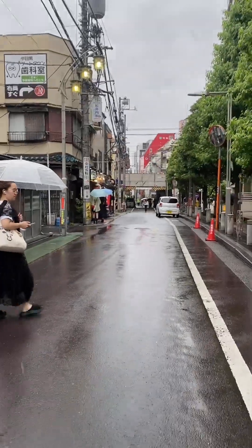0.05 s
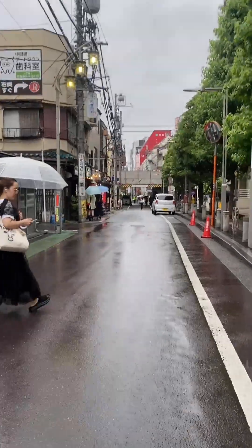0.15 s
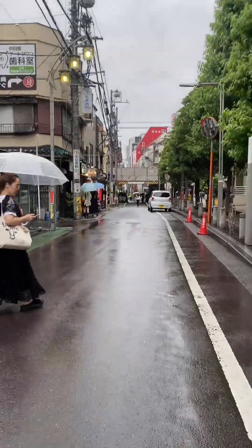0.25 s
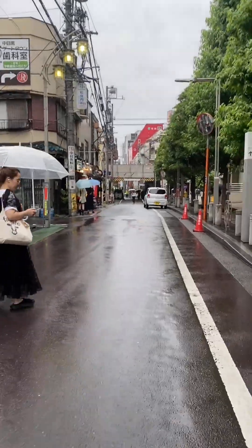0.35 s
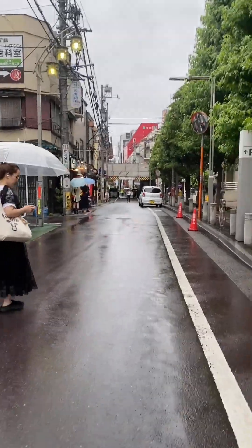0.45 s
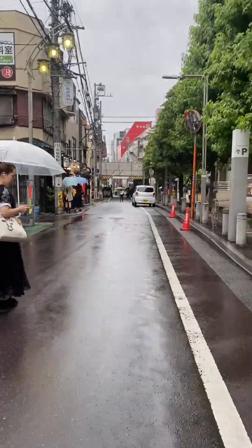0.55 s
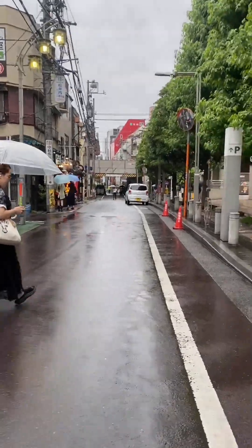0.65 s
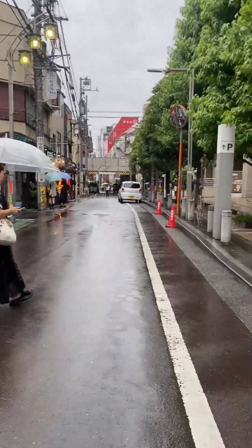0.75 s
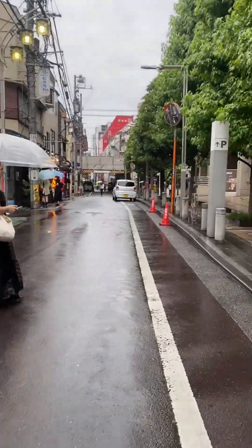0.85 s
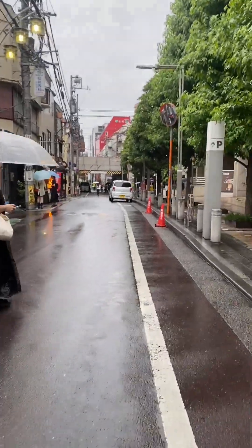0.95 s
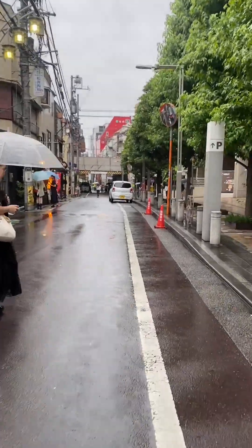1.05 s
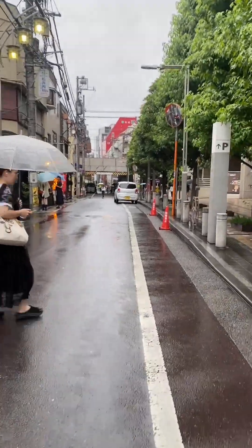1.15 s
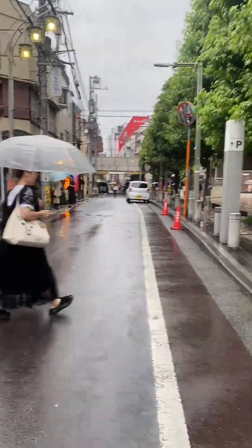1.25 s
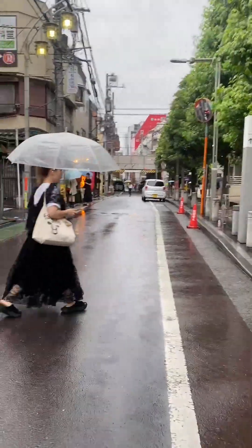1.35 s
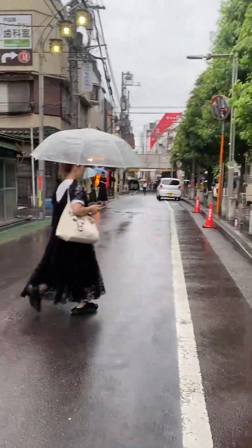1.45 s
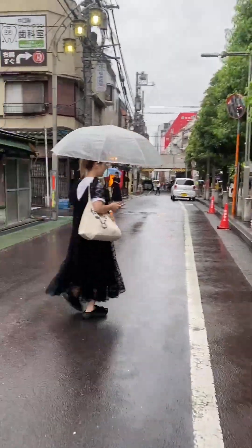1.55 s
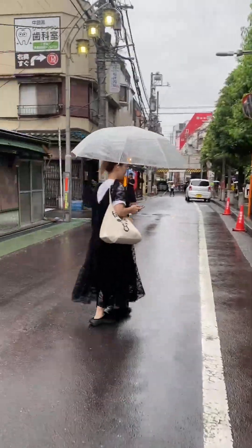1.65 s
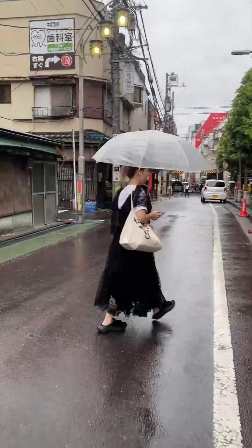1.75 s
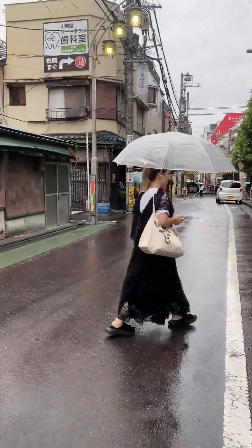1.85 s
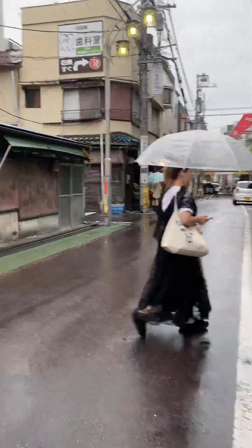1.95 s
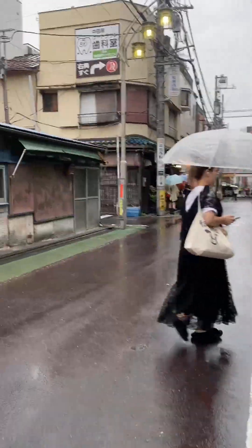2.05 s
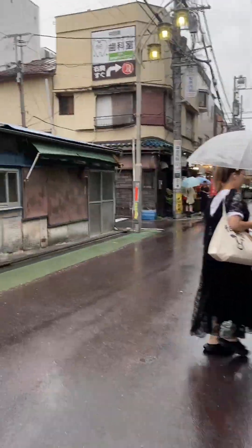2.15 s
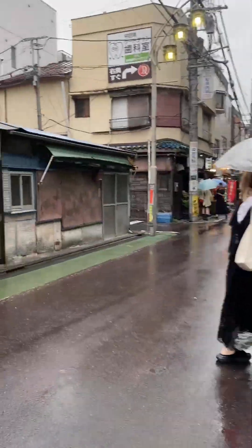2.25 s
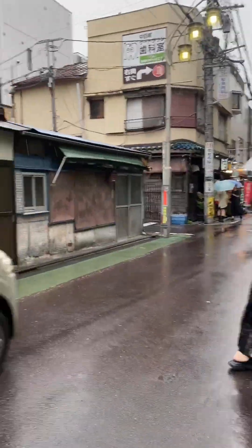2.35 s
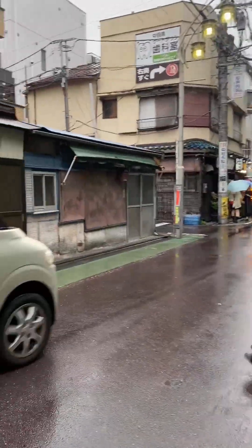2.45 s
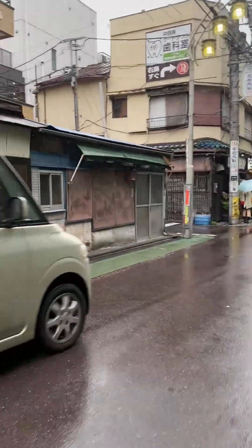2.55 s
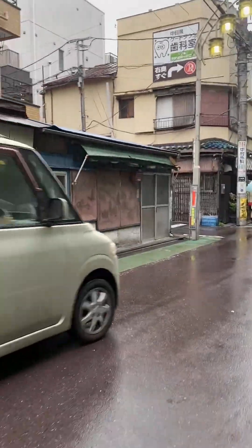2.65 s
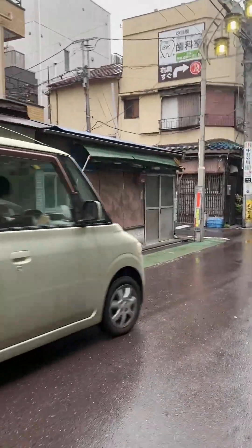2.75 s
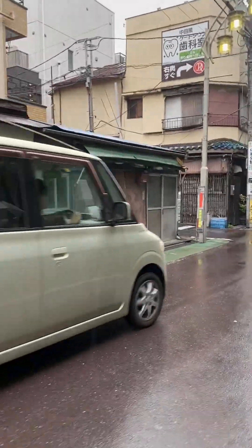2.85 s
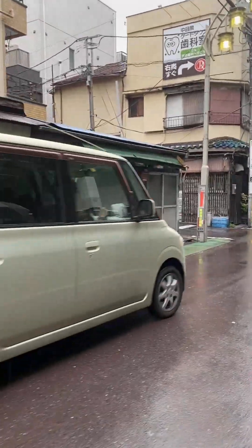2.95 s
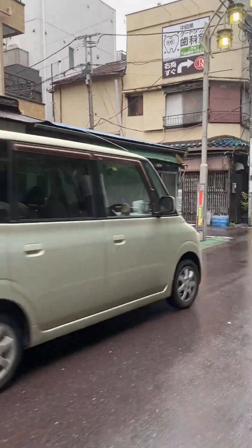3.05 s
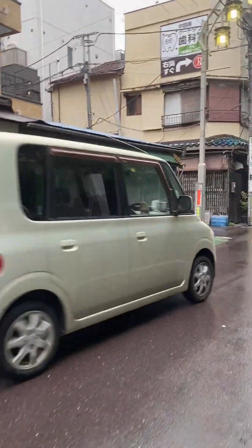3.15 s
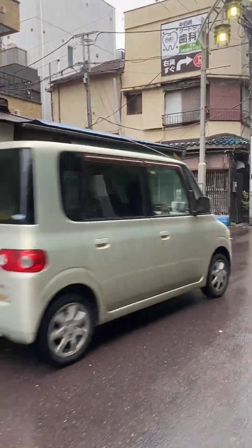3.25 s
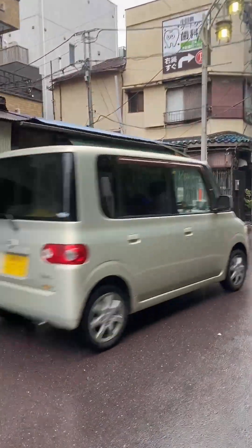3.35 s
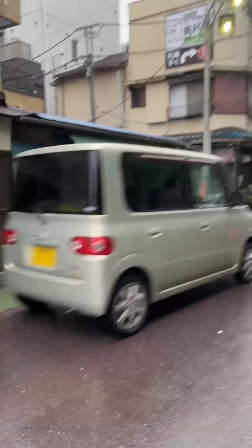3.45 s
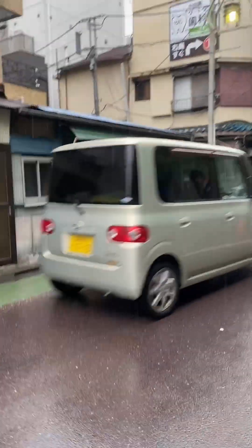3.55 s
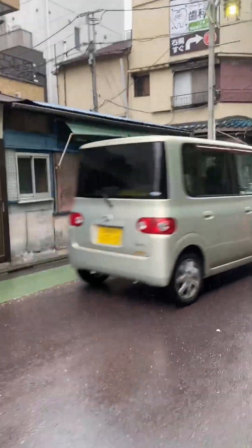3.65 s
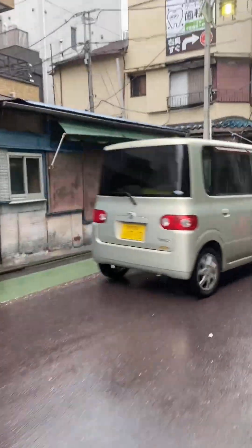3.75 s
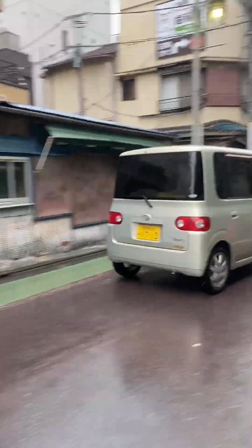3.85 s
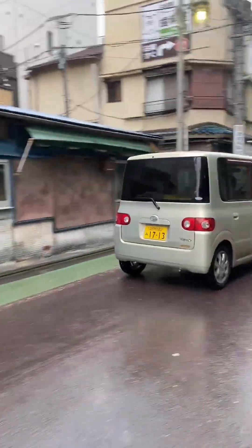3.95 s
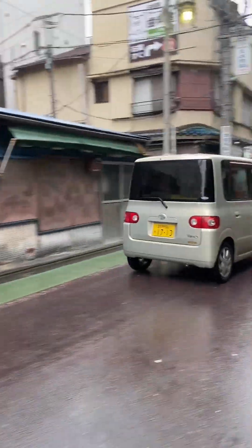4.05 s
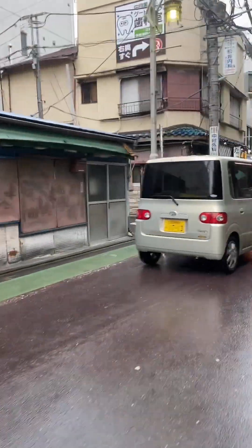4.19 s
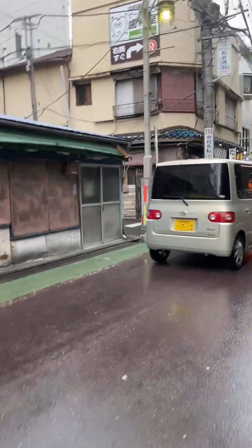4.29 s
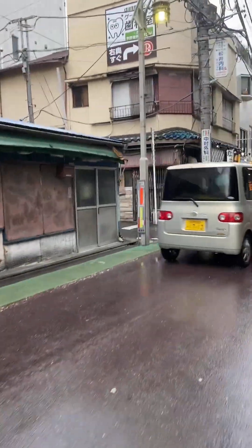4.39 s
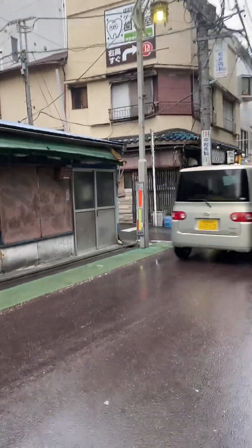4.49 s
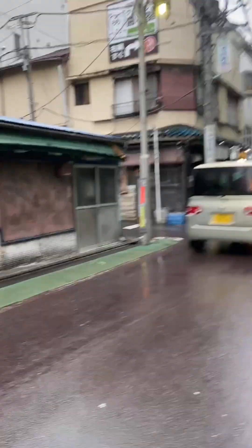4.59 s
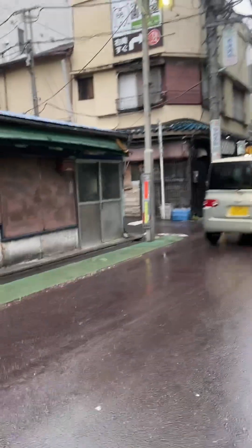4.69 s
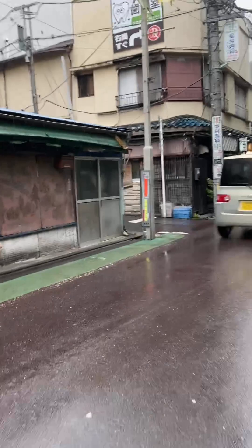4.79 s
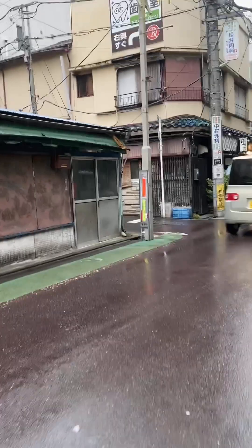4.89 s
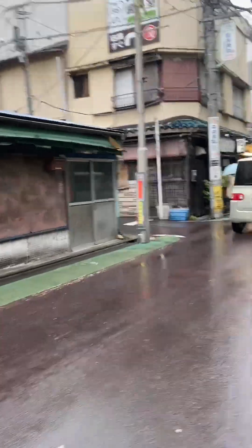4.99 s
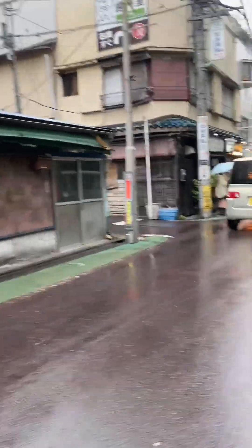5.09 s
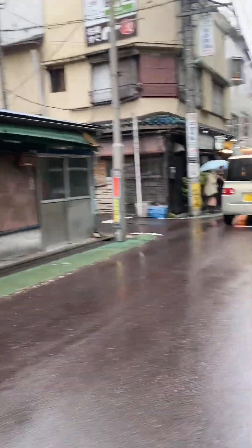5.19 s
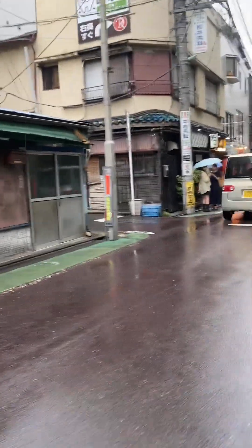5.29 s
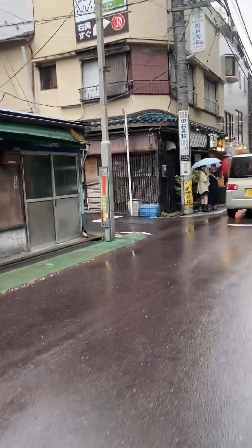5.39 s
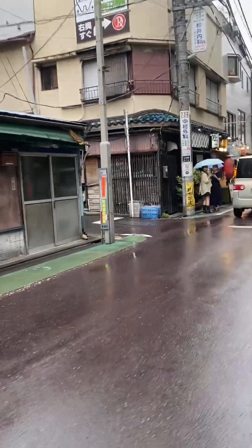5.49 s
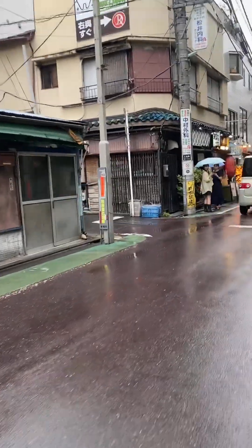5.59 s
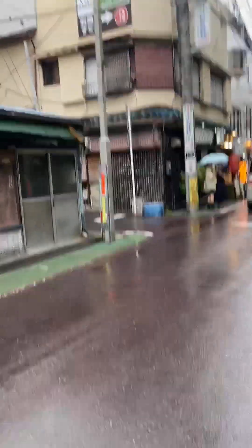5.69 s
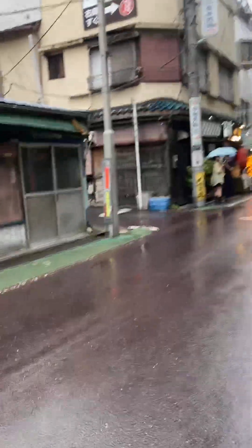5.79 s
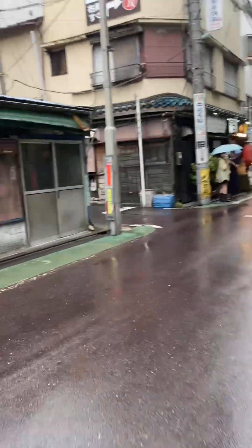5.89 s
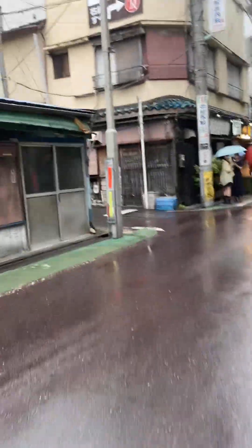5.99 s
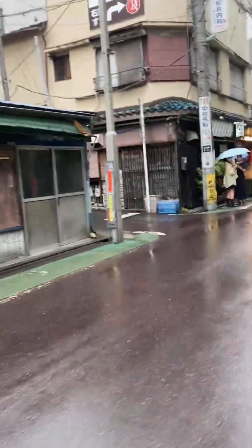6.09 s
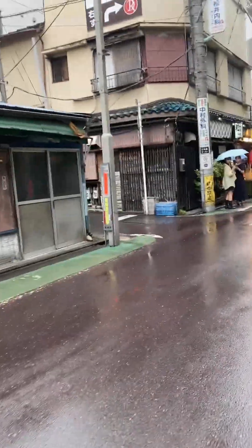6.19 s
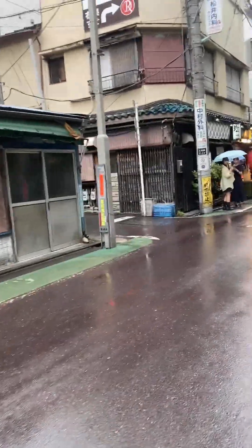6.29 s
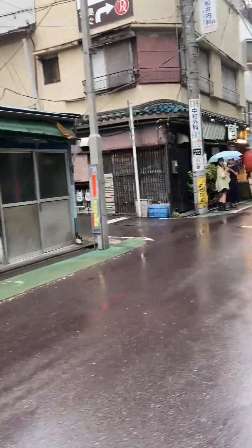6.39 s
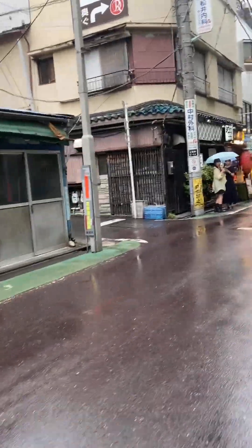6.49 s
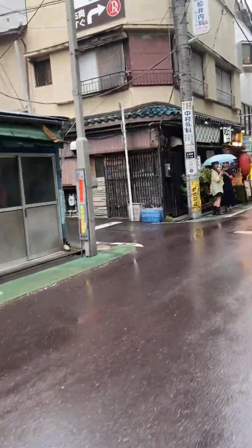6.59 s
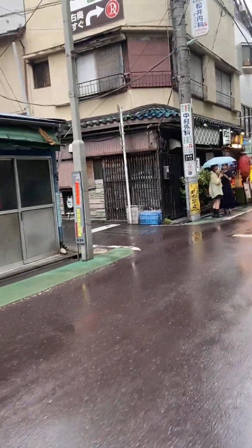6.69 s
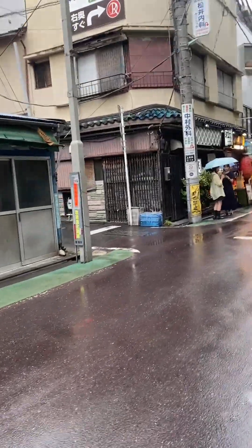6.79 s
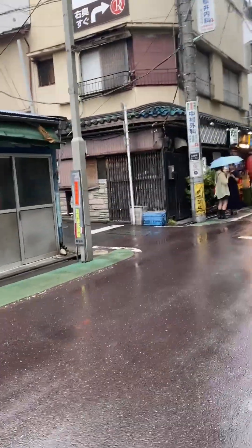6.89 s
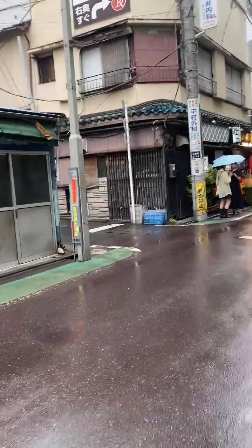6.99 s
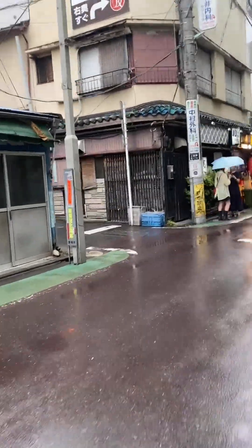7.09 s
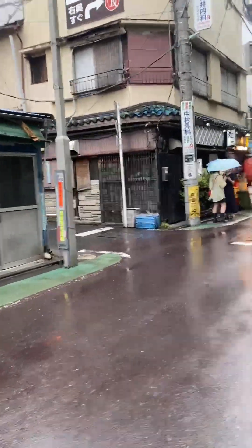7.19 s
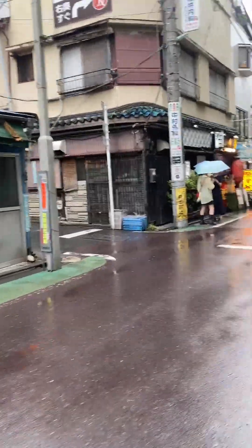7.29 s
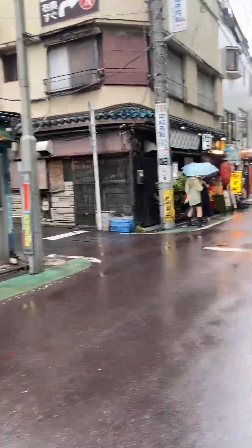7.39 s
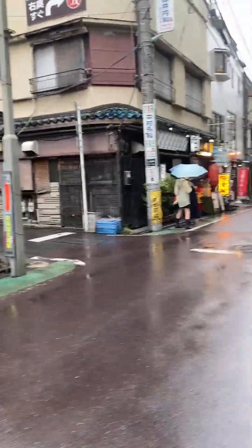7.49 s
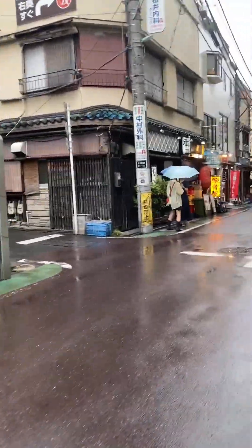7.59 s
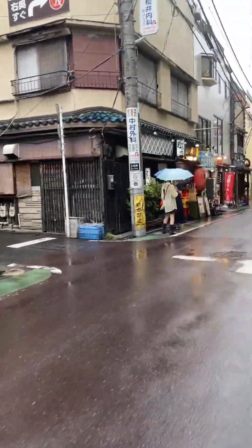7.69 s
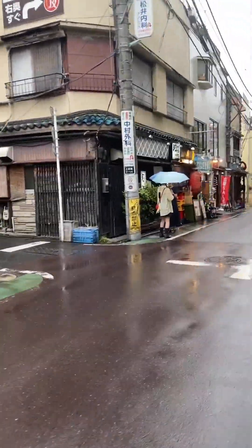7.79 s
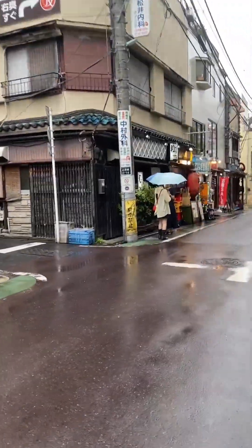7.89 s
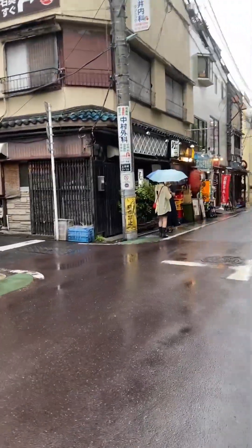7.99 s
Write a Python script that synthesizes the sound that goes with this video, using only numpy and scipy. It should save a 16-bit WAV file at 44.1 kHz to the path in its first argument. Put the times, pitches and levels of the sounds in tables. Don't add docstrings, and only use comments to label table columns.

```python
import sys
import numpy as np
from scipy import signal
from scipy.fft import rfft, irfft, next_fast_len
from scipy.io import wavfile
from scipy.ndimage import uniform_filter1d

SR = 44100
rng = np.random.default_rng(int(sys.argv[2]) if len(sys.argv) > 2 else 0)


def level_to_linear(level):
    exponent = np.asarray(level, float) / 20
    return 10 ** exponent


def dump_mix(stems):
    frames = np.atleast_2d(stems).T
    limited = np.clip(frames, -1, 1)
    pcm = np.round(limited * 32767).astype(np.int16)
    wavfile.write(sys.argv[1], SR, pcm)


N = 354563
T = np.arange(N) / SR
SIZE = next_fast_len(N + SR // 10)
HZ = np.maximum(np.arange(SIZE // 2 + 1) * SR / SIZE, 1)

# (time [s], firing rate [Hz], strength at the listener [dB],
# boom of the tailpipe turned this way [dB])
ENGINE_COURSE = [(0, 25.96, -31, 0), (.9, 26.97, -30, 0), (1.24, 27.8, -29.5, -1.5), (1.36, 31, -22, -7),
                 (1.52, 34.76, -22.5, -2.5), (1.7, 39.73, -22.5, 2), (1.9, 45.84, -19.5, 1),
                 (2.11, 49.02, -18, 0), (2.4, 51.58, -16, -1.5), (2.7, 54.3, -18, -.5),
                 (3.05, 55.24, -17.5, -2), (3.65, 55.6, -15.5, -7), (3.95, 55.94, -16.5, -8),
                 (4.25, 56.54, -13, -15), (4.42, 55.4, -16, -13.5), (4.52, 52.9, -29, 1),
                 (4.63, 49.4, -29, -3.5), (4.85, 43.39, -40.5, -17)]
# (time [s], tyre hiss at the listener [dB], spray over hiss [dB])
ROAD_COURSE = [(0, -61.5, -12), (.9, -61, -11.5), (1.2, -59, -9.5), (1.45, -60.5, -5.5), (1.75, -54, -10.5),
               (2.2, -50, -10), (2.6, -46, -9), (3.2, -45, -11), (3.55, -45.5, -8), (3.85, -47, -8),
               (4.3, -47.5, -8), (4.85, -51.5, -8), (5.3, -53, -11.5), (5.75, -56.5, -12),
               (6.25, -59.5, -13.5), (6.6, -57.5, -14.5), (8.04, -60.5, -14.5)]
# (frequency [Hz], in step [-1..1], quarter cycle ahead [-1..1])
CAR_SIDE_LINK = [(99, -.25, -.65), (300, -0.39, -.88), (550, 0, -.8), (800, -.35, -.55), (1100, -.55, -.4),
                 (1500, -.6, 0), (1750, -0.54, -.3), (2100, 0, -.68), (2520, -.45, .3), (3200, -.25, .35),
                 (4200, 0, .65), (6500, 0, .82), (8000, -0.046, .5)]


def in_time(rows):
    s, *columns = np.transpose(rows)
    return [np.interp(T, s, c) for c in columns]


def at_hz(points, column=1):
    return np.interp(np.log(HZ), np.log(np.array(points)[:, 0]), np.array(points)[:, column])


def link_of(points):
    link = at_hz(points) + 1j * at_hz(points, column=2)
    return link / np.maximum(1, np.abs(link) / .98)


def drift(rate):
    r = np.exp(-80 * np.pi * rate / SR)
    slow = signal.lfilter([1], [1, -2 * r, r * r], rng.standard_normal(N // 40 + 2002))
    slow = slow[2000:]
    return np.interp(np.arange(N) / 40, np.arange(len(slow)), slow / slow.std())


def swell(start_s, attack_s, hold_s, release_s, db):
    fade_s = np.maximum(T - start_s - attack_s - hold_s, 0)
    return level_to_linear(db - 10 * fade_s / release_s) * np.clip((T - start_s) / attack_s, 0, 1)


def tone(hz, level_db, wobble_db, wander, lag=0):
    level = np.sqrt(2) * level_to_linear(level_db + wobble_db * drift(6))
    return level * np.cos(2 * np.pi * np.cumsum(hz) / SR - lag + wander * drift(5.5))


def ringing_noise(hz, width_hz):
    low_pass = signal.butter(2, width_hz / 2, fs=SR, output="sos")
    slow = signal.sosfilt(low_pass, rng.standard_normal((2, N)))
    phase = 2 * np.pi * np.cumsum(hz * np.ones(N)) / SR
    out = slow[0] * np.cos(phase) + slow[1] * np.sin(phase)
    return out / out.std()


def wide_noise(white, mid_db, side_db, link, ref_hz, patchy_db, tilt_db=0, count=22):
    a, b = rfft(white, SIZE), rfft(rng.standard_normal(N) * white.std(), SIZE)
    mid = a * level_to_linear(mid_db)
    side = (link * a + np.sqrt(1 - np.abs(link) ** 2) * b) * level_to_linear(side_db)
    inside = (HZ > ref_hz[0]) & (HZ < ref_hz[1])
    scale = SIZE / np.sqrt(2 * np.sum(np.abs(mid[inside]) ** 2))
    centres, out, together = np.geomspace(25, 12500, count), 0, drift(2.5)
    for k, hz in enumerate(centres):
        band = np.interp(np.log(HZ), np.log(centres), np.arange(count) == k)
        if np.max(band * level_to_linear(side_db)) > 1e-4:
            share = np.clip(np.log2(hz / 2500), 0, 1)
            gain = level_to_linear(patchy_db * (.5 * together + drift(7)) + share * tilt_db)
            out = out + gain * irfft(np.array([mid, side]) * band, SIZE)[:, :N]
    return out * scale


def near(mono):
    # (frequency [Hz], side over mid [dB])
    near_width = [(60, -30), (93, -23), (140, -15), (220, -10), (340, -4), (520, 3), (810, 8), (1250, 8),
                  (1920, 1), (2970, 2), (4580, 2), (7060, 5)]
    link = link_of(CAR_SIDE_LINK)
    heard = rfft(mono, SIZE) / (1 + (HZ / 7500) ** 4)
    return irfft([heard, heard * level_to_linear(at_hz(near_width)) * link / np.abs(link)], SIZE)[:, :N]


def bubbles(count=4000):
    per_s, level_db, ring_s, spread_db = 480, 2.5, .011, 1.8
    when, pitch, size, keep = rng.random((count, 4)).T
    t = np.arange(SR // 25) / SR
    hz = 600 + 6500 * pitch[:, None]
    rings = np.sin(2 * np.pi * hz * t) * (t / ring_s) * np.exp(-t / ring_s * 2)
    sounding = keep * count < per_s * N / SR
    rings *= (level_to_linear(level_db - spread_db * np.log(size + 0.071)) * sounding)[:, None]
    places = (when * N).astype(int)[:, None] + np.arange(len(t))
    return np.bincount(places.ravel(), rings.ravel())[:N]


def droplets(per_s, level_db):
    born = rng.random(N) < per_s / SR
    click_db = level_db + 6.3 * np.minimum(rng.exponential(1, N), 2.8)
    return rng.standard_normal(N) * (1 + born * level_to_linear(click_db)) + bubbles()


def street():
    # (frequency [Hz], level [dB per Hz])
    street_mid_db = [(13, -67.5), (22, -35), (40, -12), (69, -2.5), (97, -6.5), (203, -11.5), (300, -26),
                     (338, -21.5), (443, -28), (525, -27.5), (815, -42), (1150, -38), (1330, -40.5),
                     (2900, -57.5), (7510, -76.5), (9760, -103), (16500, -120)]
    street_side_db = [(22, -17), (76, -6), (200, 0), (330, 1), (450, -2), (525, 1), (650, -5), (800, -2),
                      (1120, -3), (1460, -9), (2970, -21), (6300, -42), (10000, -70), (13000, -88)]
    # (frequency [Hz], in step [-1..1], quarter cycle ahead [-1..1])
    street_side_link = [(100, -.23, -.58), (300, -.28, -.86), (550, 0, -.75), (800, -.15, -0.18),
                        (1100, -.4, .05), (1500, -.2, .45), (2000, -.25, .25), (2500, -.15, .7),
                        (4000, -.1, .6), (6500, 0, .8), (8000, 0, 0.57)]
    # (time [s], level at 200-3000 Hz [dB], width [dB])
    street_course = [(0.0, -49.5, 1.5), (8.04, -48.5, 0.5)]
    level_db, width_db = in_time(street_course)
    noise = wide_noise(droplets(600, 0.59), at_hz(street_mid_db), at_hz(street_side_db) - 24,
                       link_of(street_side_link), ref_hz=(200, 3000), patchy_db=.8)
    mid, side = level_to_linear(level_db) * noise
    return np.array([mid, side * level_to_linear(width_db)])


def shaft():
    start_s, settle_s = 2.2, .35
    shaft_hz = 208 - 9 * np.exp(-np.maximum(T - start_s, 0) / settle_s)
    full = tone(shaft_hz, 0, 1.8, 0.14) * swell(start_s, attack_s=.6, hold_s=1.8, release_s=.2, db=-42)
    half = tone(shaft_hz / 2, 0, 0.4, 0.05) * swell(2.3, attack_s=.25, hold_s=.45, release_s=.8, db=-33)
    return full + half


def engine():
    # (frequency [Hz], gain [dB])
    pipe_response = [(33, -27), (50, -1), (68, 12.5), (80, 4), (97, 6.5), (112, -4), (135, -10),
                     (166, -0.5)]
    order_levels = [-0.5, -10, -14.5, -21.5, -26.5, -26, -37.5, -40.5]
    boom_shares = [1, 0, .5, 0, 0, 0, 0, 0]
    silencer_hz, silencer_width_hz = 158, 3
    idle_third_db, pull_away_s = -3, 1.3
    abreast = swell(1.4, attack_s=.7, hold_s=1.6, release_s=.3, db=0)

    firing_hz, strength_db, boom_db = uniform_filter1d(in_time(ENGINE_COURSE), size=SR // 16)
    pipe_hz, pipe_db = np.transpose(pipe_response)
    out = 0
    for k, db in enumerate(order_levels, start=1):
        hz = k * firing_hz
        level_db = strength_db + db + np.interp(np.log(hz), np.log(pipe_hz), pipe_db)
        level_db += boom_db * boom_shares[k - 1]
        if k == 3:
            level_db += idle_third_db * np.clip((pull_away_s - T) / 0.18, 0, 1)
        turn_over = np.pi / (1 + np.exp((silencer_hz - hz) / silencer_width_hz))
        lag = (k > 1) * (1 - turn_over)
        line = tone(hz, level_db, 0.2 + .5 * (k - 1), .05 + .03 * k, lag)
        out = out + line * (abreast if k > 3 else 1)
    end_s = ENGINE_COURSE[-1][0]
    return out * np.clip((end_s - T) / 0.088, 0, 1) + shaft()


def road():
    # (frequency [Hz], level [dB per Hz])
    tyre_mid_db = [(240, -20), (400, 0), (585, -11), (877, -7), (1160, -8.5), (1380, -12.5), (1830, -5),
                   (2340, -13.5), (2810, -11), (4020, -17.5), (4830, -28), (6320, -31), (8000, -46),
                   (12000, -75)]
    tyre_side_db = [(240, -31), (400, -4), (585, -12), (800, -4), (1050, -4), (1680, -11.5), (2070, -11),
                    (2650, -14), (4120, -25), (5070, -29), (7000, -35), (10000, -52), (11200, -68),
                    (12200, -95)]
    # (frequency [Hz], level [dB per Hz])
    rumble_mid_db = [(25, -31.5), (40, -13.5), (80, -1), (130, -10), (250, -7.5), (400, -16), (600, -33.5),
                     (800, -61)]
    rumble_side_db = [(25, -47.5), (60, -27.5), (130, -19), (250, -19), (400, -20.5), (600, -29),
                      (800, -64)]
    usual_spray_db, abreast_hiss_db = -11, -45.5
    rumble_lead_s = .3

    hiss_db, spray_db = in_time(ROAD_COURSE)
    hiss_ahead_db = np.interp(T + rumble_lead_s, T, hiss_db)
    rumble_db = -39 + 0.52 * (hiss_ahead_db - abreast_hiss_db)
    link = link_of(CAR_SIDE_LINK)
    hiss = wide_noise(droplets(1500, -3.5), at_hz(tyre_mid_db), at_hz(tyre_side_db) + 6.9, link,
                      ref_hz=(700, 3000), patchy_db=1.1, tilt_db=spray_db - usual_spray_db)
    rumble = wide_noise(rng.standard_normal(N), at_hz(rumble_mid_db), at_hz(rumble_side_db), link,
                        ref_hz=(230, 500), patchy_db=1.0)
    mid, side = level_to_linear(hiss_db) * hiss + level_to_linear(rumble_db - 2) * rumble
    aside = swell(1.2, attack_s=.3, hold_s=.45, release_s=1.2, db=3.2)
    return np.array([mid, side * level_to_linear(-1.18) * (1 + .3 * aside)])


def body():
    # (time [s], pitch [Hz], level [dB])
    air_box_course = [(0, 513, -67.5), (1.2, 528.7, -54.5), (1.55, 520.2, -58.5), (1.95, 615, -55.5),
                      (2.6, 559.6, -54.5), (3.4, 499.4, -63.5), (4.1, 450.7, -49.5), (4.7, 450, -59),
                      (5.2, 452.1, -79)]
    # (time [s], half length [s], rasp [dB], tread [dB])
    puddle_events = [
        (3.142, 0.092, -51, -54),
        (3.55, 0.1, -61, -60),
        (4.202, .12, -68.5, -60.5),
        (4.72, 0.087, -61.5, -58.5),
    ]
    box_hz, box_db = in_time(air_box_course)
    hiss_db = in_time(ROAD_COURSE)[0]
    facing_rear_db = 10.5 / (1 + np.exp((3.2 - T) / .15))
    rasp = level_to_linear(hiss_db - 23)
    tread = level_to_linear(hiss_db - 24 + facing_rear_db)
    for s, half_s, rasp_db, tread_db in puddle_events:
        crossing = np.exp(-((T - s) / half_s) ** 2)
        rasp += level_to_linear(rasp_db) * crossing
        tread += level_to_linear(tread_db) * crossing
    gate = 1 + 0.2 * np.cos(2 * np.pi * np.cumsum(in_time(ENGINE_COURSE)[0]) / SR)

    out = level_to_linear(box_db) * ringing_noise(box_hz, 64)
    out += rasp * gate * ringing_noise(2090, 750)
    out += swell(1.6, attack_s=.2, hold_s=.5, release_s=.4, db=-60) * ringing_noise(3300, 2400)
    narrow_grooves = ringing_noise(2763, 380)
    wide_grooves = level_to_linear(2) * ringing_noise(1850, 450)
    return out + tread * (narrow_grooves + wide_grooves)


def ticks():
    # (time [s], peak [dB], ring [Hz])
    drip_events = [(.531, -43, 1000), (.58, -47, 700), (5.868, -46, 700), (6.55, -48, 1100),
                   (6.7, -52, 1800), (6.745, -54, 2000), (1.911, -50, 6000), (5.271, -32, 1800),
                   (5.76, -54, 5200), (5.762, -55, 7000), (6.14, -56, 8500)]
    out, t = np.zeros(N), np.arange(SR // 50) / SR
    for s, db, hz in drip_events:
        ring = np.sin(2 * np.pi * hz * t) * np.exp(-t * hz / 3.1) * np.minimum(t * hz, 1)
        click = .05 * rng.standard_normal(len(t)) * np.exp(-t / .0006)
        out[round(s * SR):][:len(t)] += level_to_linear(db) * (ring + click)
    return out


def scuffs():
    # (time [s], level [dB], centre [Hz], length [s])
    scuff_events = [
        (1.386, -61.5, 4200, .022),
        (5.325, -66, 4000, .035),
        (6.515, -73, 4000, .045),
        (7.1, -75, 3800, .035),
        (5.385, -42, 450, .03),
        (6.08, -31, 200, .07),
        (.87, -33, 120, .08),
        (7.67, -60, 1500, .04),
    ]
    # (frequency [Hz], width [Hz], gain [dB])
    sole_rings = [(3800, 250, 25), (5500, 250, 14), (7000, 250, 14)]
    out, t = np.zeros(N), np.arange(SR // 5) / SR
    for s, db, hz, length_s in scuff_events:
        grain_db = 1.4 * rng.standard_normal(len(t) // 60 + 1).repeat(60)[:len(t)]
        grit = rng.standard_normal(len(t)) * level_to_linear(grain_db)
        edges_hz = [hz / 1.7, min(hz * 1.7, SR * .45)]
        burst = signal.sosfilt(signal.butter(2, edges_hz, "band", fs=SR, output="sos"), grit)
        for ring_hz, width_hz, ring_db in sole_rings:
            ring_filter = signal.iirpeak(ring_hz, ring_hz / width_hz, fs=SR)
            burst += level_to_linear(ring_db) * signal.lfilter(*ring_filter, burst)
        shape = np.minimum(t / (0.19 * length_s), 1) * np.exp(-(t / length_s) ** 2)
        out[round(s * SR):][:len(t)] += level_to_linear(db) * burst * shape
    return out


def far_engine():
    # (time [s], length [s], level [dB])
    surge_events = [
        (5.112, .82, -30),
        (5.95, .38, -33),
        (6.44, .26, -35.5),
        (6.76, .78, -35),
        (7.64, .9, -36),
    ]
    edge_s, fade_db_per_s = .09, 1.5
    gain = 0
    for s, length_s, db in surge_events:
        to_edge_s = np.minimum(T - s, s + length_s - T)
        gain = gain + level_to_linear(db - fade_db_per_s * (T - s)) * np.clip(to_edge_s / edge_s + .5, 0, 1)
    drone_hz = 69.18 - .6 * (T - surge_events[0][0])
    return gain * tone(drone_hz, 0, 0.85, 0.34)


def scene():
    close = engine() + body() + ticks() + scuffs() + far_engine()
    mid, side = street() + near(close) + road()
    return np.array([mid + side, mid - side])


def band_limit(x):
    return signal.sosfilt(signal.butter(12, 12350, fs=SR, output="sos"), x)


def record(dry):
    mid, side = (dry[0] + dry[1]) / 2, (dry[0] - dry[1]) / 2
    mid = signal.sosfiltfilt(signal.cheby2(8, 30, 8900, fs=SR, output="sos"), mid)
    side = signal.sosfiltfilt(signal.butter(4, 12000 * .88, fs=SR, output="sos"), side)
    loudness = uniform_filter1d(np.abs(side), size=SR // 4)
    mid += ringing_noise(12020, 240) * level_to_linear(-52) * loudness
    return band_limit(np.array([mid + side, mid - side]))


dry = scene()
out = record(dry)
dump_mix(out)
```